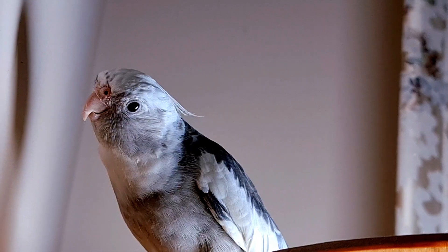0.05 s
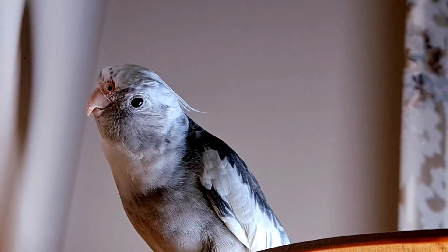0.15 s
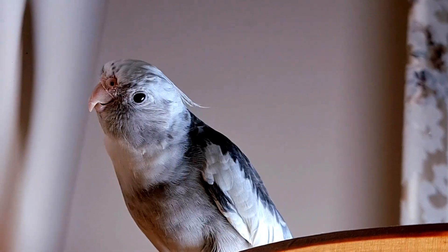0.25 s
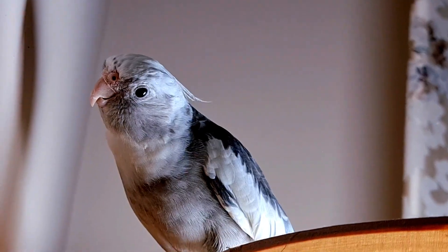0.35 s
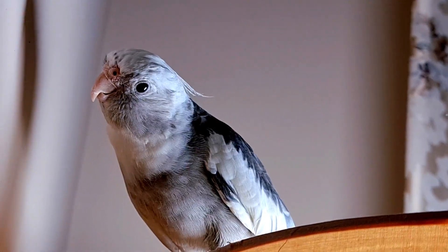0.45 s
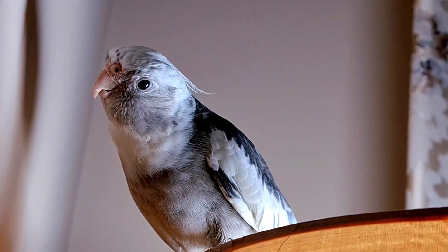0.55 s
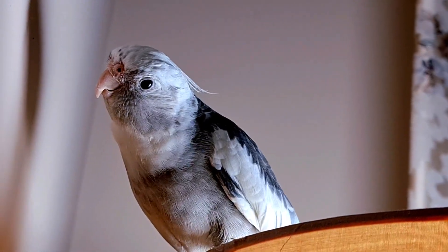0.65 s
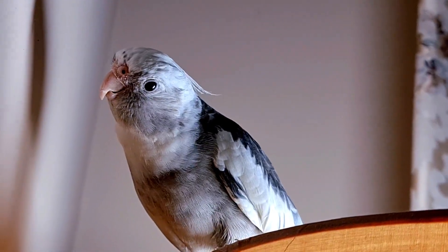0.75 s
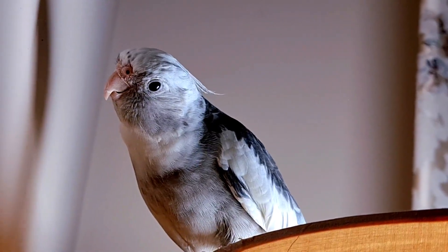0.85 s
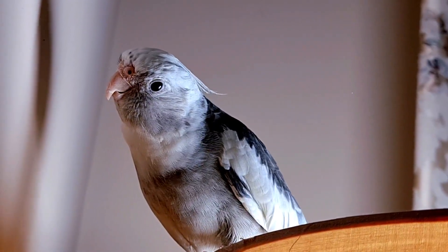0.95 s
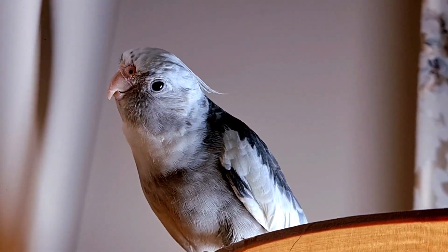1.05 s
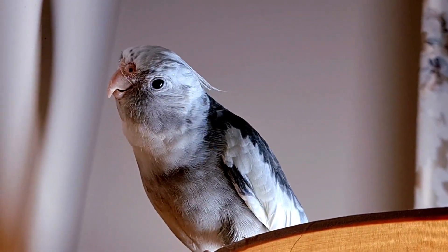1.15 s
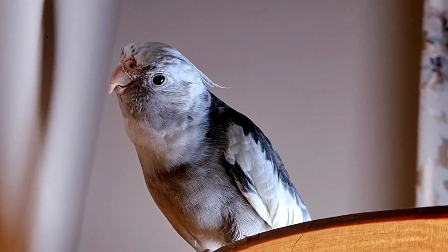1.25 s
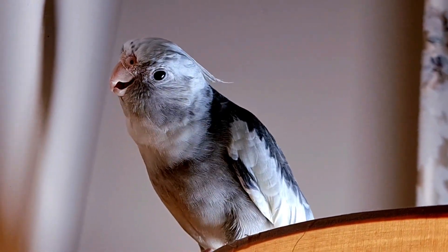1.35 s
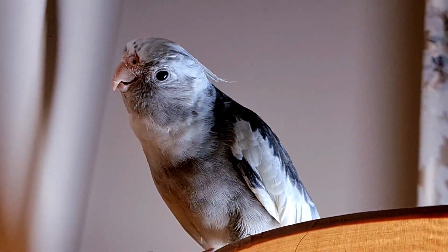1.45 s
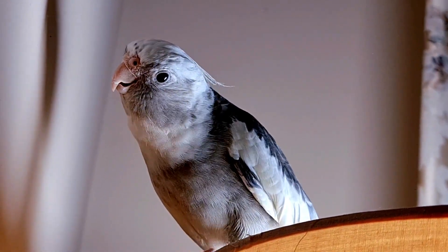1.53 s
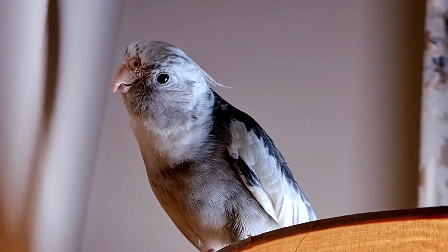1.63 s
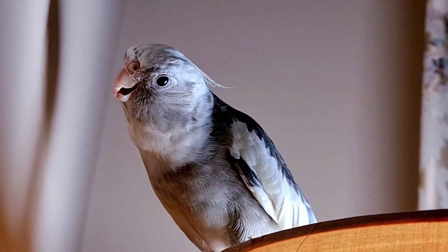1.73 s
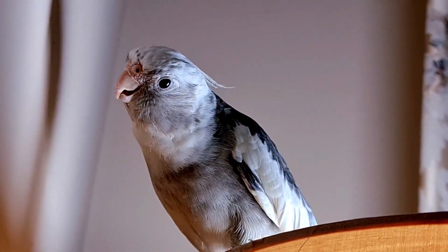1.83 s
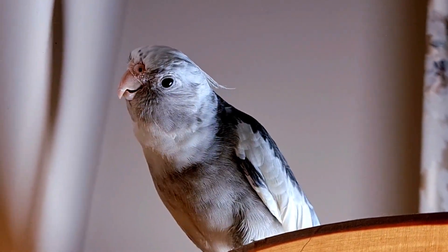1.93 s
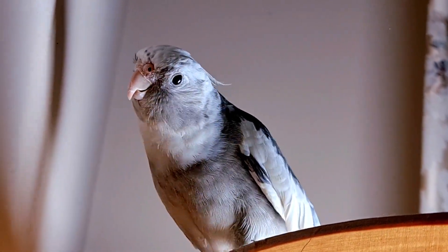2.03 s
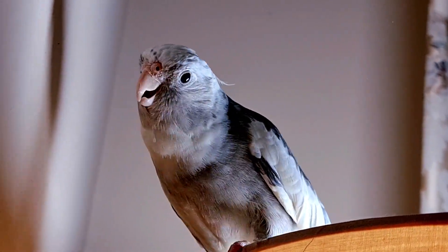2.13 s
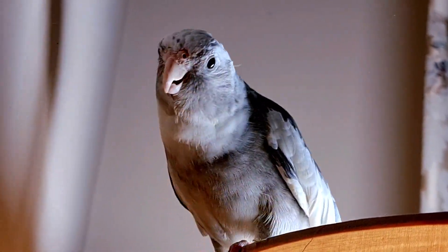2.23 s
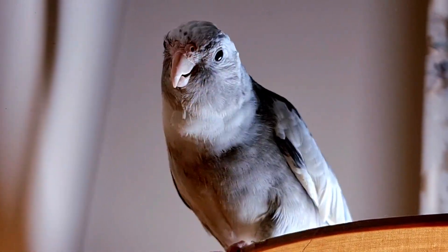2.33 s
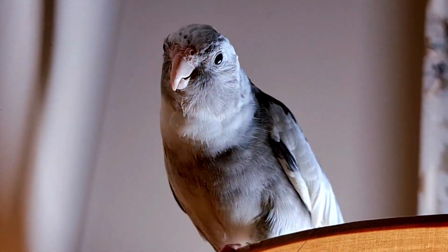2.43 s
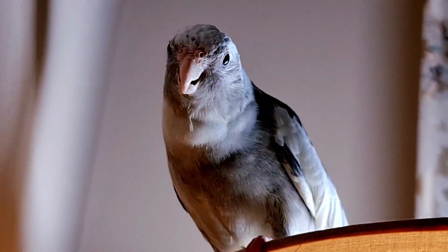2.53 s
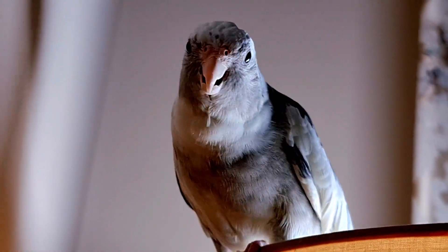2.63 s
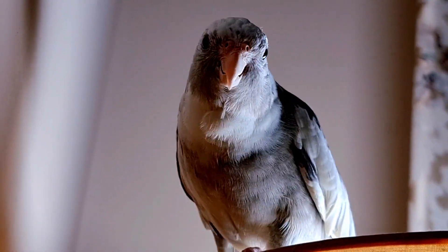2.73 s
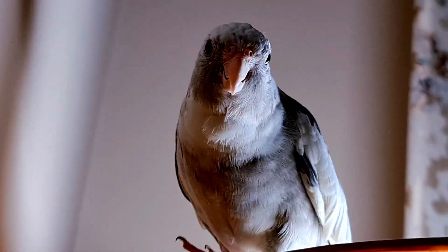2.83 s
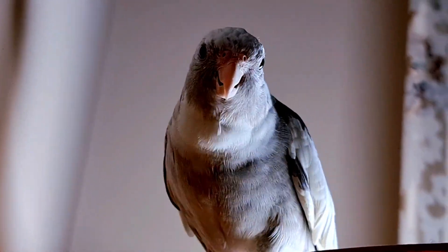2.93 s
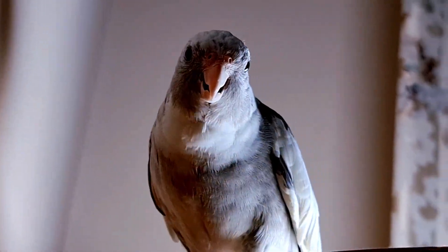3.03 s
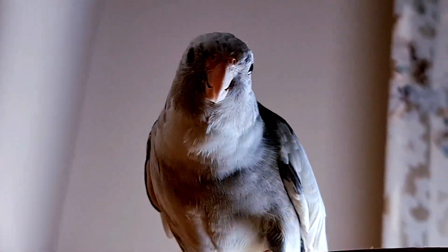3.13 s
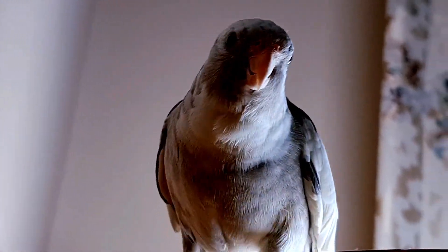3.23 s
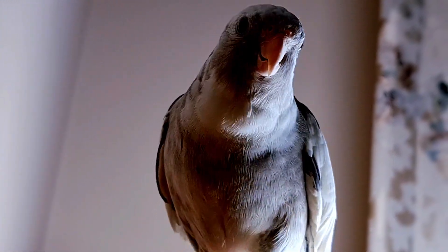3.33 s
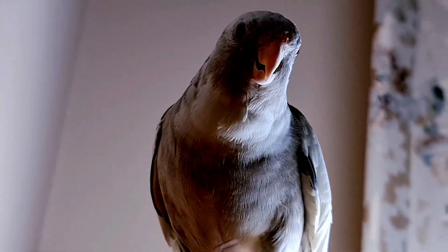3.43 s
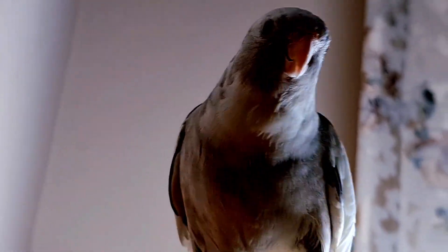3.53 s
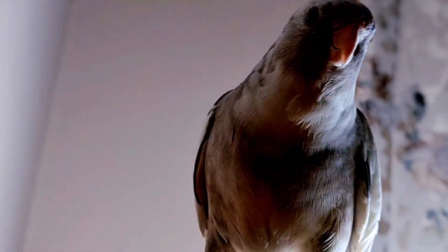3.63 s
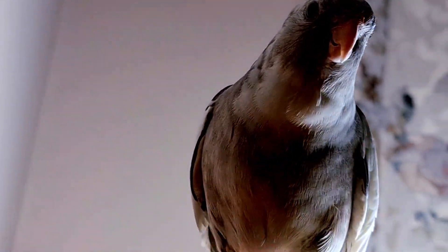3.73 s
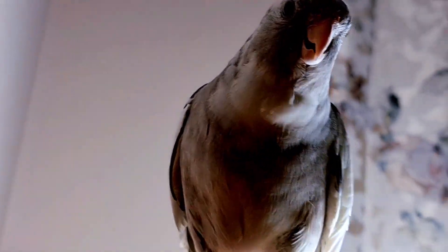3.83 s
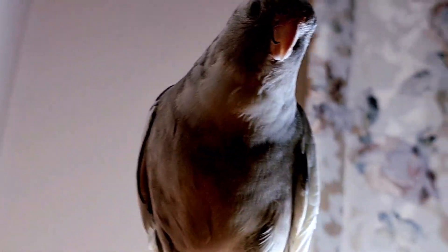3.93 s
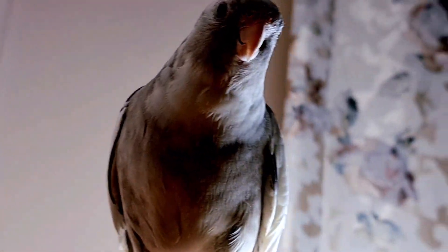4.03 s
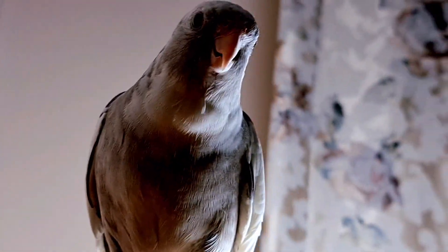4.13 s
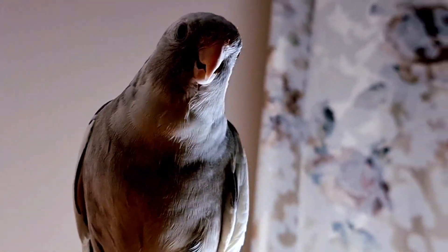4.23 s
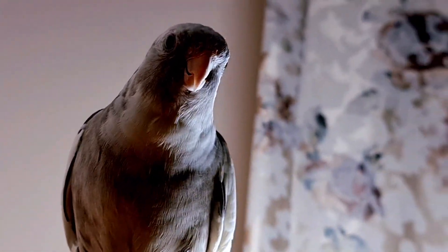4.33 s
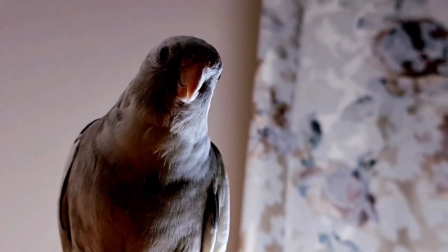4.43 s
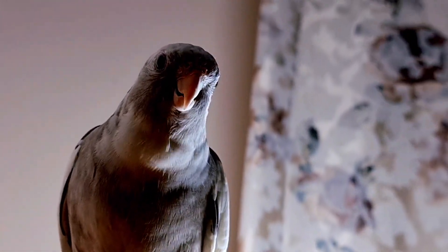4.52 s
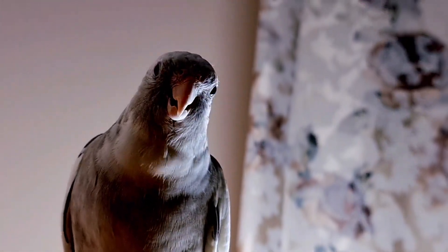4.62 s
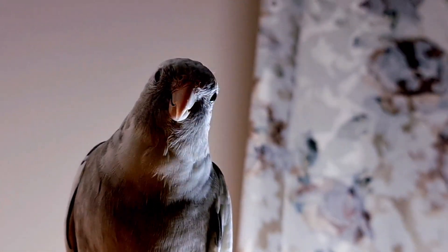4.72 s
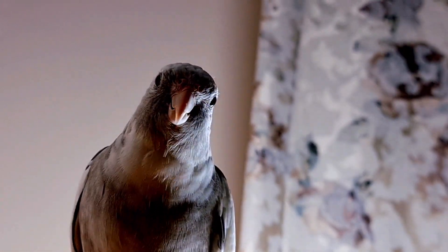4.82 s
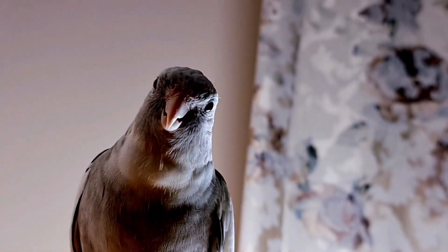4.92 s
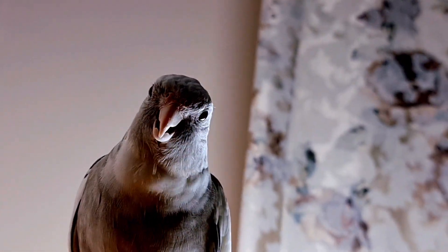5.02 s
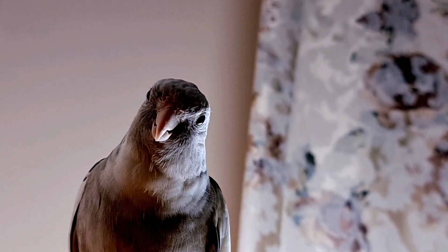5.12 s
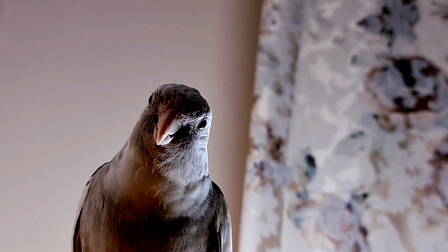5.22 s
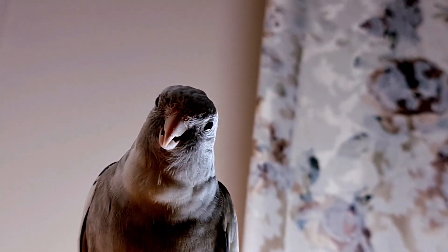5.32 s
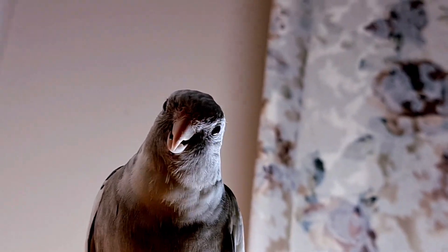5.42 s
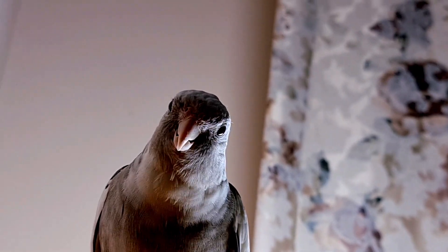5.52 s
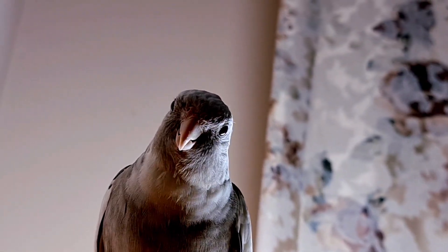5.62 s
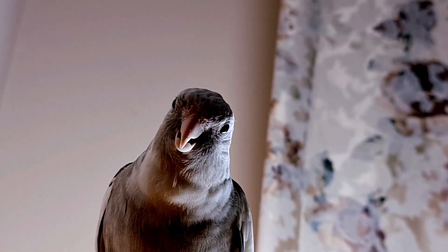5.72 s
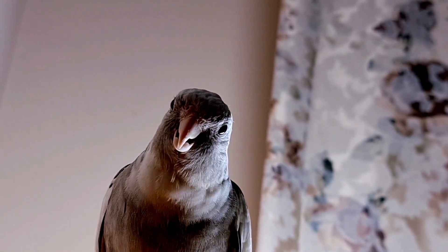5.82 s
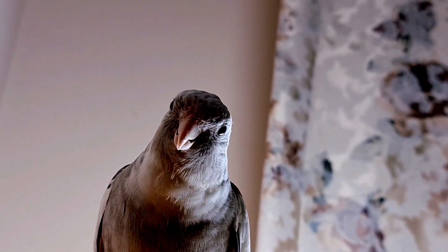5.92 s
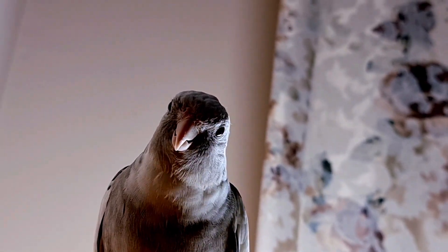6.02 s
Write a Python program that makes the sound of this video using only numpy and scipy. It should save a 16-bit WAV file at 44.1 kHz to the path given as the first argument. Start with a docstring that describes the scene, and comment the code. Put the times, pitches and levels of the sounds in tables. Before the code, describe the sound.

A perched pet bird, close to the microphones in a furnished room. After a hushed opening with a brief soft rustle, it repeats a rapid, regular pattern about every 0.4 seconds until the end: a muted, slightly hoarse low peep, then a strong bright whistle rippling upward and snapping down. The sound leans left, with short indoor reflections; low hiss, hum and rumble stay barely audible beneath.

```python
"""A small parrot on a wooden perch repeats a two-part phrase: a soft low peep with the beak nearly shut,
then a loud whistle that climbs in warbling steps and drops away. Both are a gliding tone with overtones,
a hoarse half-pitch tone and breath noise. A furnished room answers with echoes and a short tail.
A soft rustle comes before the song and footfalls knock on the perch; hiss, hum, rumble and a flickering
low tone lie below. Spaced microphones hear the bird a little later on the right."""
import sys
import numpy as np
from scipy import signal
from scipy.fft import rfft, irfft, next_fast_len
from scipy.io import wavfile
from scipy.ndimage import uniform_filter1d, minimum_filter1d, map_coordinates

SR = 44100
rng = np.random.default_rng(int(sys.argv[2]) if len(sys.argv) > 2 else 0)


def to_wav(sig):
    """Store sig (one row per channel, or 1-D mono) as 16-bit WAV at the path in sys.argv[1].

    Samples outside -1..1 are clipped; the rate is SR.
    """
    pcm = np.clip(np.atleast_2d(sig), -1, 1) * 32767
    pcm = np.round(pcm).astype(np.int16)
    wavfile.write(sys.argv[1], SR, pcm.T)  # frames by channels


def boost(x):
    """Linear amplitude factor 10**(x/20) for a level x in decibels (scalar or array-like)."""
    u = np.asarray(x, float) / 20
    return 10 ** u


N = 267510


def rms_one(x):
    """Scale to rms 1."""
    return x / np.sqrt(np.mean(x ** 2) + 1e-20)


def in_time(rows, outside=None):
    """Columns of a table joined by straight lines, one value a sample."""
    s, *columns = np.transpose(rows)
    return [np.interp(np.arange(N) / SR, s, column, outside, outside) for column in columns]


def at_hz(points, hz):
    """Read a spectrum on a log-frequency axis."""
    point_hz, value = np.array(points).T
    return np.interp(np.log(hz), np.log(point_hz), value)


def drift(rate):
    """Random wander of rms 1: noise through two equal one-pole lowpasses at rate [Hz]."""
    r = np.exp(-2 * np.pi * rate / SR)
    wander = signal.lfilter([1], [1, -2 * r, r * r], rng.standard_normal(N + SR))
    return rms_one(wander[SR:])


# how alike noise is in the two channels: (frequency [Hz], left-right likeness [0-1])
LIKENESS = [(60, .8), (300, .75), (700, .5), (1400, .05), (15000, 0)]


def coloured(spectrum):
    """Stereo noise of a given spectrum, alike in both channels as the room makes it; rms 1."""
    hz = np.maximum(np.fft.rfftfreq(N, 1 / SR), 1)
    alike = np.clip(at_hz(LIKENESS, hz), 0, 1)
    mid, side = rfft(rng.standard_normal((2, N)))
    pair = np.sqrt(1 + alike) * mid + np.sqrt(1 - alike) * side * [[1], [-1]]
    return rms_one(irfft(pair * boost(at_hz(spectrum, hz)), N))


# whistles, each with a quiet lead-in: (start [s], end [s], early lead-in level [dB], late lead-in level [dB],
# level at the foot of the drop [dB])
WHISTLE_SPANS = [(1.392, 1.5438, -23, -20, -38.5), (1.8048, 1.9527, -30, -26.5, -29.5),
                 (2.212, 2.3624, -31, -31.5, -40), (2.643, 2.7838, -31.5, -36.5, -27.5),
                 (3.0538, 3.1912, -33, -32.5, -38.5), (3.4486, 3.596, -32, -31, -43.5),
                 (3.8552, 3.995, -39.5, -30, -72), (4.2434, 4.385, -32.5, -31.5, -41.5),
                 (4.63, 4.7817, -30.5, -33, -35.5), (5.0265, 5.173, -34.5, -29, -33),
                 (5.4104, 5.5536, -30, -30.5, -34.5), (5.8126, 5.959, -31.5, -27, -28)]
# steps of the warble, each climbing from a dip to a crest: (dip time [s], dip pitch [Hz], climb [ms],
# crest pitch [Hz], level on arrival [dB], level on leaving [dB])
STEPS = [(1.426, 1658, 17, 2117, -13, -8.5), (1.4527, 1957, 13, 2843, -7, -2.5),
         (1.4793, 2303, 9, 3144, -6, -2.5), (1.504, 2715, 7, 3209, -10, -4.5),
         (1.8373, 1645, 15, 2486, -13.5, -12), (1.8643, 2059, 12, 3092, -6.5, -13),
         (1.8959, 2749, 6, 3270, -11, -4), (1.9196, 3052, 8.7, 3318, -7.5, -17),
         (2.2419, 1678, 17, 2135, -18, -17), (2.273, 2005, 12, 3054, -9.5, -9.5),
         (2.3017, 2436, 10, 3194, -6.5, -5), (2.3331, 2881, 4.5, 3115, -8, -23),
         (2.6755, 1639, 14.5, 2436, -12, -7.5), (2.7028, 1998, 12, 3045, -10.5, -11),
         (2.7313, 2359, 10, 3160, -4, -6), (2.7578, 2797, 11, 3219, -6, -8.5),
         (3.0853, 1651, 13.5, 2195, -17.5, -17.5), (3.1105, 1852, 17, 2878, -14, -12),
         (3.1387, 2472, 9, 3058, -8, -15.5), (3.1713, 2385, 3.9, 2450, -22.5, -24.5),
         (3.4888, 1582, 13, 2062, -18.5, -16), (3.516, 1835, 13, 2653, -7.5, -19.5),
         (3.539, 2104, 12, 3038, -5, -11), (3.5688, 2906, 7, 3117, -9.5, -22),
         (3.894, 1594, 10.5, 2048, -15.5, -18.5), (3.9176, 1777, 15, 2816, -11, -15.5),
         (3.9436, 2218, 9.2, 3137, -6, -23.5), (3.963, 2983, 9, 3141, -6, -16.5),
         (4.2772, 1613, 11.5, 2034, -15.5, -14), (4.3013, 1830, 14, 2566, -17.5, -11.5),
         (4.3272, 2062, 11, 3164, -10, -9.5), (4.353, 2555, 7.5, 2965, -16.5, -16),
         (4.6695, 1604, 11.5, 2059, -15, -13), (4.6955, 1892, 15, 2947, -18, -8),
         (4.7265, 2300, 8, 3133, -10.5, -12), (4.7512, 2815, 7.5, 3168, -5, -13.5),
         (5.064, 1588, 24, 2405, -17.5, -9), (5.095, 2040, 18, 3091, -8, -2.5),
         (5.1232, 2335, 9, 3175, -7.5, -8), (5.1513, 2340, 3.9, 2279, -28, -21.5),
         (5.4353, 1645, 6.6, 1893, -24, -20), (5.4566, 1802, 17, 2913, -11, -6.5),
         (5.4839, 2223, 9, 3115, -9.5, -6.5), (5.513, 2830, 10, 3085, -10, -15),
         (5.8508, 1650, 16.5, 2332, -16, -11.5), (5.8844, 2003, 13, 3052, -3, -9.5),
         (5.9154, 2485, 10, 3195, -11.5, -7.5)]
# the lead-in swells from ONSET_DB below its level in ATTACK_MS and glides for ONSET_MS
ONSET_HZ, LEAD_HZ, ONSET_MS, ONSET_DB, ATTACK_MS = 1326, 1408, 14.0, -17, 9.2
# a climb starts slowly: share of its time, of its pitch gain, of its dB gain
LINGER, LINGER_PITCH, LINGER_LEVEL = .3, .17, 0.6
# a crest sinks into the next dip in SINK_MS at the reference pitch, low crests more slowly
SINK_MS, SINK_REF_HZ, SINK_POWER = 7.5, 3176, 3.1
DIP_DB_PER_OCTAVE = 55.5   # the tone weakens as it sinks
# the last crest drops away: ms per octave, tail ms, pitches at the foot and the end, dB from foot to end
DROP_MS, TAIL_MS, DROP_HZ, TAIL_HZ, TAIL_DB = 12, 3.6, 1680, 1705, -12
# bend in the drop: share of its time, share of the crest pitch, highest level there
DROP_KNEE, DROP_KNEE_PITCH, DROP_KNEE_DB = 0.54, .9, -22


def whistle(start, end, lead_db, late_db, foot_db):
    """Turning points (s, Hz, dB) of one whistle: lead-in, warble steps, drop."""
    attack_hz = ONSET_HZ + (LEAD_HZ - ONSET_HZ) * min(ATTACK_MS / ONSET_MS, 1)
    rows = [(start, ONSET_HZ, lead_db + ONSET_DB),
            (start + ATTACK_MS / 1000, attack_hz, lead_db),
            (start + ONSET_MS / 1000, LEAD_HZ, lead_db)]
    dip_db = late_db
    steps = [row for row in STEPS if start < row[0] < end]
    for (s, dip_hz, climb_ms, crest_hz, arrive_db, leave_db), after in zip(steps, steps[1:] + [None]):
        top = s + climb_ms / 1000
        if after:
            sinks = after[0] - SINK_MS / 1000 * (SINK_REF_HZ / crest_hz) ** SINK_POWER
        else:
            sinks = end - (TAIL_MS + DROP_MS * np.log2(crest_hz / DROP_HZ)) / 1000
        linger = (s + LINGER * (top - s),
                  dip_hz + LINGER_PITCH * (crest_hz - dip_hz),
                  dip_db + LINGER_LEVEL * (arrive_db - dip_db))
        sinks = max(sinks, top + 1 / 1000)
        rows += [(s, dip_hz, dip_db), linger, (top, crest_hz, arrive_db), (sinks, crest_hz, leave_db)]
        if after:
            dip_db = leave_db - DIP_DB_PER_OCTAVE * max(np.log2(crest_hz / after[1]), 0)
    fallen = end - TAIL_MS / 1000
    knee = (sinks + DROP_KNEE * (fallen - sinks), DROP_KNEE_PITCH * crest_hz, min(DROP_KNEE_DB, leave_db))
    return rows + [knee, (fallen, DROP_HZ, foot_db), (end, TAIL_HZ, foot_db + TAIL_DB)]


# soft peeps: (start [s], length [s], base pitch [Hz], late pitch [Hz], early level [dB], late level [dB],
# half-pitch tone gain [dB])
PEEP_CALLS = [(1.2465, .084, 1200, 1926, -26, -20.5, -35.5),
              (1.6335, .102, 1258, 1605, -28.5, -32.5, -28.5), (2.0331, 0.097, 1330, 1658, -32.5, -31, -30),
              (2.4499, .122, 1335, 1680, -30.5, -32.5, -23.5), (2.868, .109, 1213, 1567, -33.5, -39, -27.5),
              (3.2818, .089, 1158, 1352, -36, -37, -30), (3.7003, .073, 1189, 1223, -40.5, -42, -24.5),
              (4.0947, .056, 1134, 1119, -36.5, -44.5, -29), (4.4713, 0.06, 1135, 1127, -39.5, -44, -32),
              (4.8759, .077, 1178, 1248, -36.5, -45, -24), (5.2566, .07, 1165, 1222, -35, -41.5, -26),
              (5.6497, 0.075, 1178, 1351, -40, -30.5, -33)]
# contour of every peep: (time [share of length], bend from base to late pitch [share], extra pitch [Hz],
# extra level [dB])
PEEP_SHAPE = [(0, 0.064, 54, -18), (0.099, 0.16, 36, -8.5), (0.218, 0, -3.5, -5.5), (0.449, .12, 3.5, 1.5),
              (0.701, .7, 0, -5), (.83, 0.99, 1.5, 1), (1, .95, -0.5, -3.5)]


def peep(start, length, base_hz, late_hz, early_db, late_db):
    """Turning points (s, Hz, dB) of one peep: it settles, swells and bends to its late pitch."""
    return [(start + share * length,
             base_hz + bend * (late_hz - base_hz) + extra_hz,
             early_db + bend * (late_db - early_db) + swell_db)
            for share, bend, extra_hz, swell_db in PEEP_SHAPE]


# strength of the membrane's overtones 2, 3, 4, ..: (level [dB])
OVERTONES_DB = [-9, -14, -15, -14, -19.5, -14, -19.5, -35.5, -27.5]
# windpipe and beak colour the overtones: (frequency [Hz], gain [dB])
TRACT = [(1000, -7.5), (1500, -5.5), (2200, -3), (3100, 2.5), (4000, 3), (5000, 6), (5700, -4), (6400, -10),
         (7500, -13), (9500, -21.5), (10500, -19.5), (12500, -18.5), (13800, -27), (15200, -20)]
# air hissing through throat and beak: (frequency [Hz], relative density [dB per Hz])
AIR = [(200, -74), (350, -44.5), (520, -14.5), (720, -6.5), (950, -21.5), (2000, -6), (3000, -21),
       (5000, -15), (8000, -37), (11000, -28), (13000, 1.5), (15500, -15.5)]
LOUDEST_DB = -1.5   # ceiling on the level of the turning points
EFFORT_MS = 22      # smoothing time of the breath pressure
BRIGHTEN, FULL_EFFORT_DB = 0.27, -3   # overtones outgrow the effort by this power, up to full effort
BEAD_DB, BEAD_HZ, BEAD_BELOW_HZ = 5.5, 45, 2100   # below this pitch the tone breaks into beads
HALF_WAVER_DB = 3.0   # slow waver of the half-pitch tone
ONSET_PUFF, ONSET_PUFF_MS = 3.0, 5.8   # each note opens with extra air: strength, decay time


def voice(notes, overtone_db, half_db, third_half_db, half_fade_hz, breath_db, treble_db, open_air,
          wobble, glide_ms, edge_ms):
    """A syrinx tone with overtones; at low pitch it is hoarse, with a tone at half the pitch."""
    t = np.arange(N) / SR
    facing_db = in_time(HEAD)[2]
    rows = [(s, hz, boost(min(db, LOUDEST_DB))) for s, hz, db in np.concatenate(notes)]
    glide = max(1, int(glide_ms * SR / 1000))   # the membrane cannot turn faster
    hz, level = [uniform_filter1d(column, glide) for column in in_time(rows)]
    gate = sum(np.clip(np.minimum(t - n[0][0], n[-1][0] - t) * 1000 / edge_ms + 1, 0, 1) ** 2 for n in notes)
    hz = hz * (1 + wobble * drift(87))
    phase = 2 * np.pi * np.cumsum(hz) / SR

    # the breath behind the tone changes more slowly than the tone itself
    effort = np.minimum(uniform_filter1d(level, int(EFFORT_MS * SR / 1000)), 3.0 * level)
    low = 1 / (1 + (hz / half_fade_hz) ** 18.0)   # near 1 at low pitch
    bead_db = BEAD_DB * (.5 - np.abs(drift(BEAD_HZ))) / (1 + (hz / BEAD_BELOW_HZ) ** 8)
    level = level * boost(bead_db)

    # uneven closing shakes the higher overtones most
    shake = rms_one(signal.sosfilt(signal.butter(4, 450, fs=SR, output="sos"), drift(250)))
    flutter = (.08 + .14 * low) * shake
    tone = level * np.sin(phase) * (1 + flutter)
    bright = effort * np.minimum(effort / boost(FULL_EFFORT_DB), 1) ** BRIGHTEN
    for k, db in enumerate(OVERTONES_DB, 2):
        patchy_db = 3.5 * drift(45)   # each overtone breaks up on its own
        tract_db = at_hz(TRACT, k * hz) - at_hz(TRACT, hz)
        gain = boost(db + patchy_db + overtone_db + facing_db + tract_db)
        tone += bright * gain * (k * hz < 17000) * np.sin(k * phase + 1.8 * k * flutter)
    halves = level * low * boost(half_db + HALF_WAVER_DB * drift(2.2)) * (1 + 0.65 * drift(43))
    tone += halves * (np.sin(phase / 2) + boost(third_half_db) * np.sin(3 * phase / 2))

    puff = sum((t > n[0][0]) * np.exp(-np.abs(t - n[0][0]) * 1000 / ONSET_PUFF_MS) for n in notes)
    throat_colour = [(f, db + treble_db * (f > 9000)) for f, db in AIR]
    throat_hiss = coloured(throat_colour)[0]
    no_lows = signal.butter(6, 1600, "high", fs=SR, output="sos")   # an open beak passes no lows
    beak_hiss = signal.sosfilt(no_lows, coloured(AIR)[0])
    air = low * throat_hiss * (1 + np.cos(phase) / 2) + open_air * (1 - low) * beak_hiss
    air = air * (1 + ONSET_PUFF * puff)
    # the hiss grows more slowly than the tone
    return np.sqrt(2) * gate * (tone + boost(breath_db) * effort ** .7 * air)


def parrot():
    """One syrinx sings both parts: open-beak whistles, and duller, hoarser peeps with the beak nearly shut."""
    whistles = voice([whistle(*row) for row in WHISTLE_SPANS], overtone_db=0.48, half_db=-23.0,
                     third_half_db=-6, half_fade_hz=1475, breath_db=-48.5, treble_db=7.5, open_air=.15,
                     wobble=.003, glide_ms=2.5, edge_ms=3.0)
    start, *_, half_db = np.transpose(PEEP_CALLS)
    # each peep has its own hoarseness, taken up 10 ms before it starts
    latest = np.maximum(np.searchsorted(start, np.arange(N) / SR + .01) - 1, 0)
    peeps = voice([peep(*row[:-1]) for row in PEEP_CALLS], overtone_db=-9.5, half_db=half_db[latest],
                  third_half_db=6.0, half_fade_hz=1520, breath_db=-35, treble_db=-26, open_air=.25,
                  wobble=.006, glide_ms=5.0, edge_ms=2.6)
    return whistles + peeps


# head posture; voice() reads the last column, as the beak faces the microphones: (time [s],
# left over right [dB], right channel lag [ms], overtone gain [dB])
HEAD = [(1.45, 4.5, 0.13, -8), (1.88, 4.5, 0.13, -7.5), (2.28, 3.5, 0.13, -6), (2.72, 7, 0.14, -5.5),
        (3.12, 4, 0.054, -3), (3.53, 5.5, 0.028, -3.5), (3.93, 3, 0.049, -4.5), (4.31, 0.9, 0.12, -4),
        (4.7, 3.5, 0.11, -5), (5.1, 7, 0.11, -3), (5.48, 4, 0.082, -3), (5.89, 1.5, 0.083, -3.5)]


def microphones(x):
    """Spaced pair: the direct sound differs in level and reaches the right microphone a little late."""
    pan_db, lag_ms = in_time(HEAD)[:2]
    late = map_coordinates(x, [np.arange(N) - lag_ms * SR / 1000], order=3)
    return np.array([x * boost(pan_db / 2), late * boost(-pan_db / 2)])


# early echoes off perch, curtain and walls: (left delay [ms], left level [dB], right delay [ms],
# right level [dB])
ECHOES = [(1.4, -14, 1.952, -12.5), (3.1, -36.5, 3.9, -10), (5.7, -29, 4, -13), (9.1, -9, 14, -12),
          (14.3, -19, 6.6, -5)]
# reverberation time of the circling paths: (frequency [Hz], time to fall 60 dB [s])
ROOM_T60 = [(500, 0.77), (1500, 0.27), (3100, 0.35), (6000, 0.26), (12000, 0.18)]


def room(x, tail_db, onset_ms):
    """A few distinct echoes, then sound circling between walls on many unrelated paths, dying band by band."""
    size = next_fast_len(N + SR)
    hz = np.maximum(np.fft.rfftfreq(size, 1 / SR), 1)

    def delay(ms):
        """Phase turn of a pure delay."""
        return np.exp(-2j * np.pi * hz * ms / 1000)

    t60 = at_hz(ROOM_T60, hz)
    response = np.zeros((2, len(hz)), complex)
    for k, ms in enumerate(np.geomspace(17.3, 47.9, 24)):
        trip = boost(-60 * ms / 1000 / t60) * delay(ms)
        response[k % 2] += (-1) ** (k // 2) * trip / (1 - trip)
    for ms in (1.1, 2.9, 5.3):   # furniture scatters each echo
        response *= (delay(ms) - .6) / (1 - .6 * delay(ms))
    # the nearest walls answer this much sooner than a full trip
    response *= boost(tail_db) * np.conj(delay(onset_ms))
    for left_ms, left_db, right_ms, right_db in ECHOES:
        response += [boost(left_db) * delay(left_ms), boost(right_db) * delay(right_ms)]
    return irfft(rfft(x, size) * response, size)[:, :N]


# feet shift on the perch: (time [s], level [dB])
THUDS = [(3.176, -52), (3.278, -55), (3.34, -52.5)]


def thuds(hz, t60):
    """Soft footfalls set the perch ringing briefly: clicks through a damped resonance."""
    clicks = np.zeros(N)
    for s, db in THUDS:
        clicks[round(s * SR)] = boost(db)
    r, w = boost(-60 / (t60 * SR)), 2 * np.pi * hz / SR
    return signal.lfilter([0, np.sin(w)], [1, -2 * r * np.cos(w), r * r], clicks + 1e-18)


# swell of the soft rustle before the song: (time [s], level [dB])
RUSTLE = [(0.2, -85), (0.264, -59), (0.38, -83)]
# its colour: (frequency [Hz], relative density [dB per Hz])
RUSTLE_COLOUR = [(530, -60), (900, -42), (1020, -40), (1350, -0.5), (1530, -15), (2530, -13), (4500, -23),
                 (6850, -21), (8000, -39), (10400, -76), (17600, -120)]


def rustle():
    """A short swell of coloured noise."""
    return coloured(RUSTLE_COLOUR) * boost(in_time(RUSTLE, -150)[0])


# faint low tone under the song: (time [s], level [dB])
FLICKER = [(1.6, -95), (2.3, -75.5), (2.6, -73), (3.5, -74), (4.6, -81.5), (5.2, -93), (6.0, -89)]


def flicker():
    """A low sine around 698 Hz that flickers in level and wanders in pitch."""
    level = boost(in_time(FLICKER)[0] + 3.4 * drift(7.0))
    phase = 2 * np.pi * np.cumsum(698 + 21.0 * drift(17)) / SR
    return np.sqrt(2) * level * np.sin(phase)


# steady hum lines: (frequency [Hz], level [dB])
HUM = [(150.7, -84.5), (393.0, -77.5), (1771, -94), (3666, -99)]


def hum():
    """A few sines, each wavering slightly in level."""
    t = np.arange(N) / SR
    return sum(np.sqrt(2) * boost(db + 0.9 * drift(4.8)) * np.sin(2 * np.pi * hz * t) for hz, db in HUM)


# swell of the rumble: (time [s], level [dB])
RUMBLE = [(0.1, -60), (0.15, -67.5), (1.59, -83.5), (4.1, -71.5), (5.0, -77.5), (6.06, -74.5)]


def rumble():
    """Low noise, strongest near 45 Hz, that swells and sinks."""
    colour = [(15, -62.5), (45, 0), (85, -8.5), (130, -18.0), (200, -54.5)]   # (Hz, relative dB per Hz)
    return coloured(colour) * boost(in_time(RUMBLE)[0])


# colour of the background hiss: (frequency [Hz], relative density [dB per Hz])
HISS = [(90, -51.5), (130, -4.5), (250, -9.5), (450, -8.5), (700, -13.5), (1000, -21), (1800, -15.5),
        (3600, -25.5), (6000, -22.5), (9000, -38), (15500, -51)]


def hiss():
    """Steady coloured noise at -72.5 dB rms."""
    return boost(-72.5) * coloured(HISS)


def scene():
    """Bird in the room over rustle, footfalls and background."""
    bird = parrot()
    direct = boost(-0.37) * microphones(bird)
    echoing = room(bird, tail_db=-19.0, onset_ms=9.0)
    background = flicker() + hum() + rumble() + hiss()
    return direct + echoing + rustle() + thuds(hz=240, t60=.07) + background


def limiter(x, ceiling_db, release_db_s, attack_ms):
    """Gain drops just ahead of peaks over the ceiling and recovers steadily."""
    width = int(attack_ms * SR / 1000) * 2 + 1
    over_db = np.maximum(20 * np.log10(np.abs(x).max(axis=0) + 1e-9) - ceiling_db, 0)
    ramp = release_db_s * np.arange(N) / SR
    held_db = np.maximum.accumulate(over_db + ramp) - ramp   # falls at the release rate
    gain_db = uniform_filter1d(minimum_filter1d(-held_db, width), width)
    return x * boost(gain_db)


def low_pass(x):
    """Removes everything above the highest recorded frequency."""
    return signal.sosfilt(signal.butter(12, 17060, fs=SR, output="sos"), x)


def record(dry):
    """The sound fades in over 2.2 ms after a silent 0.11 s, and a limiter holds the peaks."""
    fade = np.clip((np.arange(N) / SR - 0.11) / 0.0022, 0, 1)
    mix = limiter(dry * fade, ceiling_db=-.4, release_db_s=120, attack_ms=3.0)
    return low_pass(mix)


dry = scene()
out = record(dry)
to_wav(out)
```